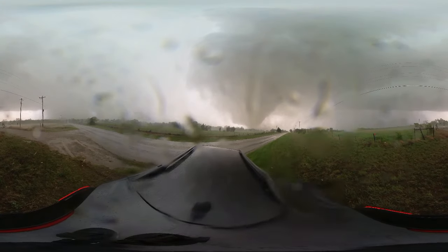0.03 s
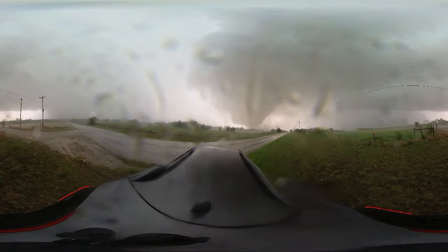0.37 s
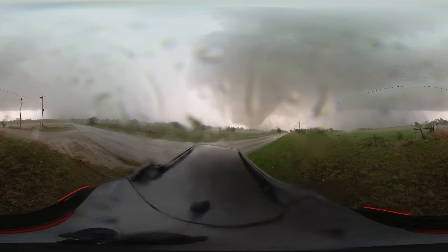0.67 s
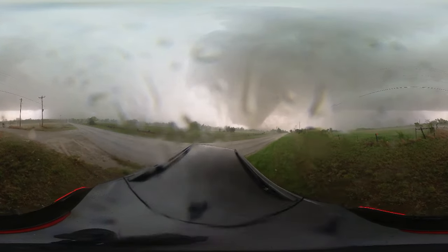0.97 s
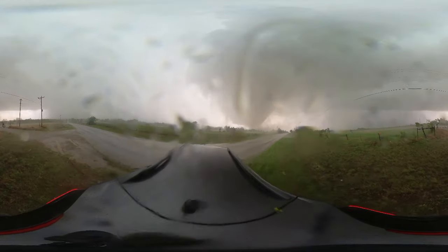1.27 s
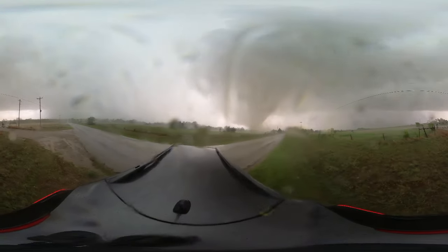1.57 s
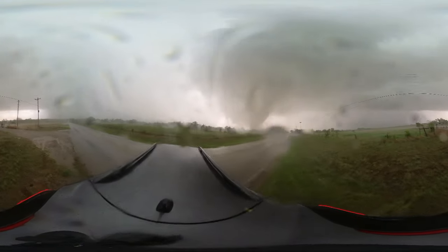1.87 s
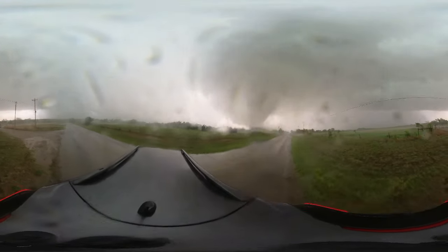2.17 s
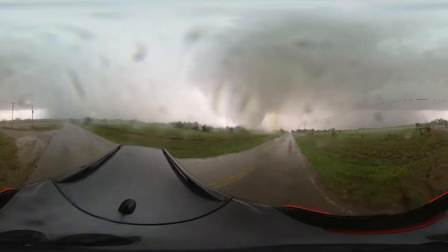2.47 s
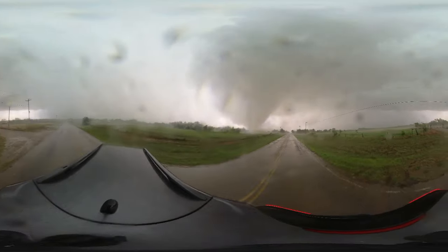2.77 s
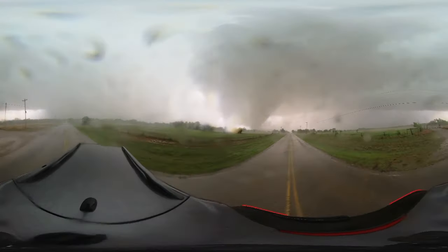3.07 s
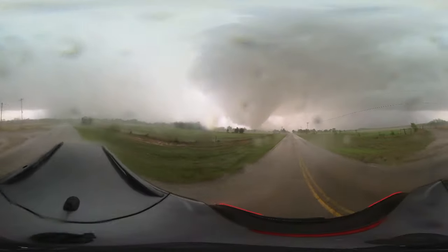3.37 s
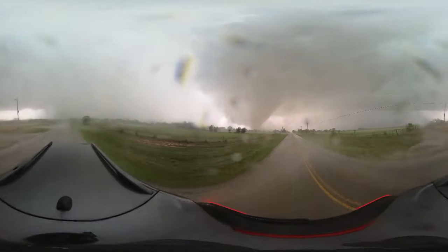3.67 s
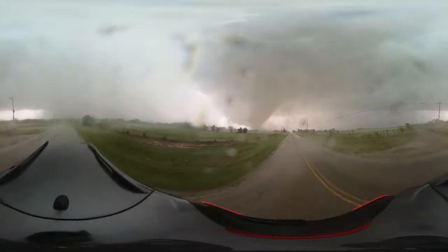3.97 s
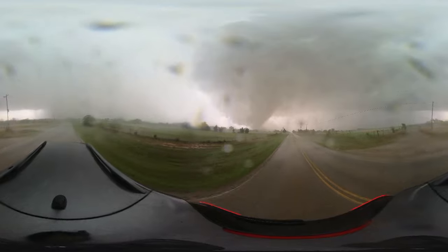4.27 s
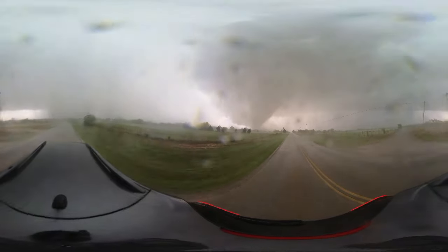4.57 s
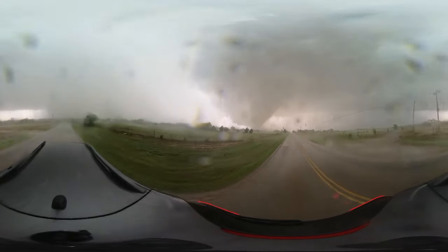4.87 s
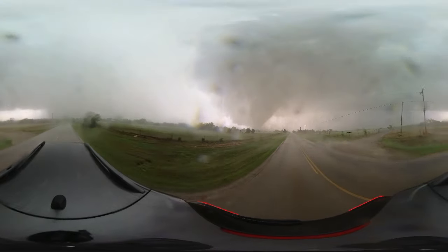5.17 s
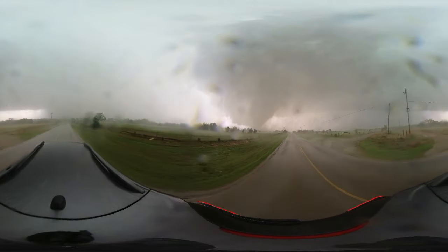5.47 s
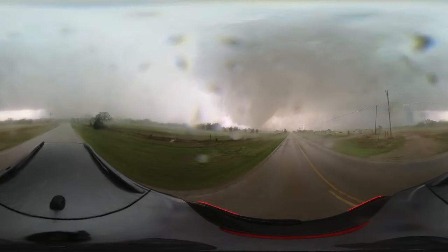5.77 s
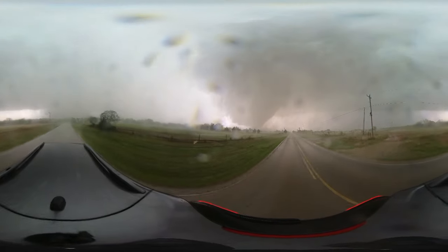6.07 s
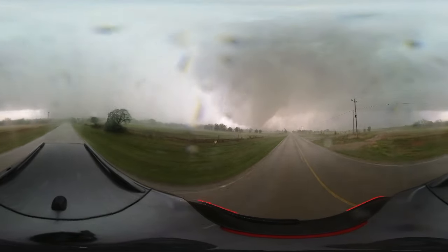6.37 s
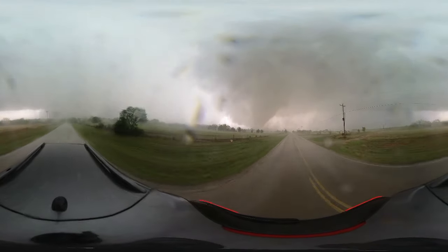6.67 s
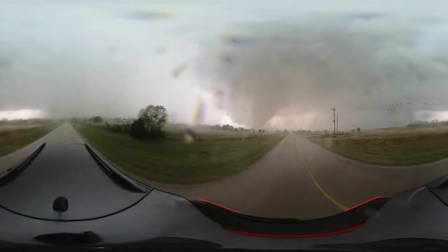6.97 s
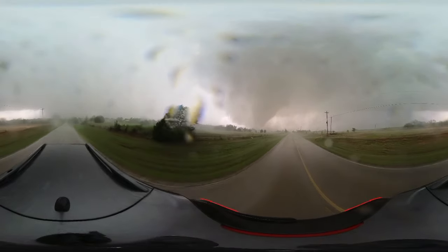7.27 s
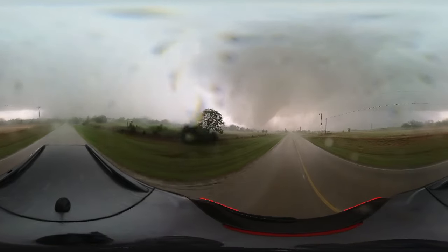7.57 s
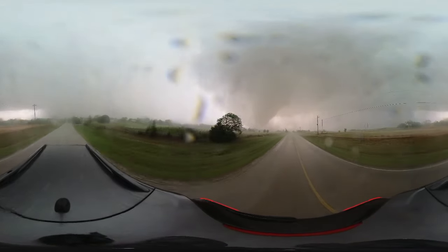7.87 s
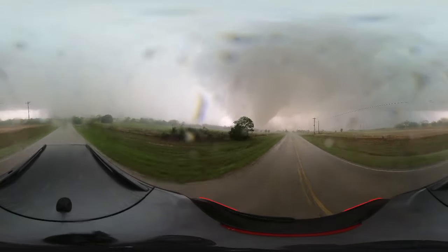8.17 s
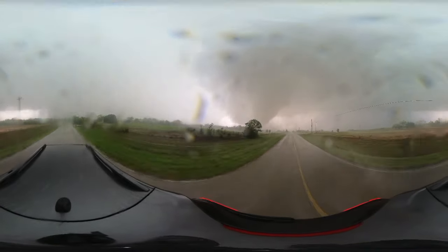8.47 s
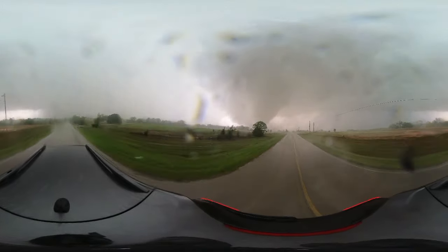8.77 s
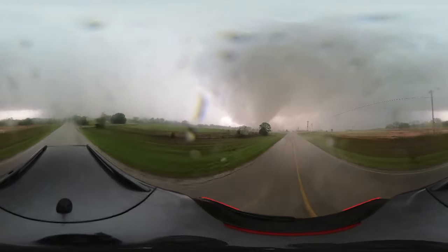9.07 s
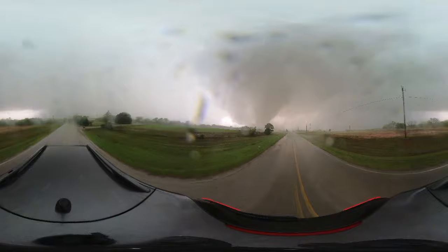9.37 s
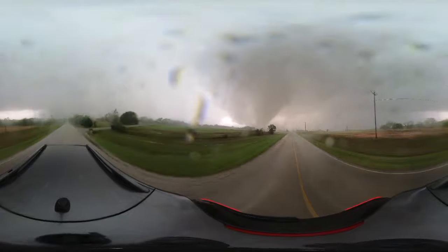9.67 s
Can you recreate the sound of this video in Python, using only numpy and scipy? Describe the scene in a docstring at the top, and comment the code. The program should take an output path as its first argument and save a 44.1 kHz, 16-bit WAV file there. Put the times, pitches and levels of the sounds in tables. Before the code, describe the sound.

Gusty wind buffets a microphone on a moving car, building to a steady low roar with light raindrop ticks and brief wet cracks.

```python
"""Wind buffets a camera microphone on a car roof, first in separate puffs, then as a steady roar,
as the car turns onto a country road and speeds up through a rainstorm. Everything is right at the
microphone: raindrops tick on the housing and dull slaps of wind knock at its port. Near 1.2 s and 7 s
a film of water covers the port, booms, cracks and briefly chokes the roar; the second time air
sputters through it. Mono, with a limiter holding down the peaks."""
import sys
import numpy as np
from scipy import signal
from scipy.fft import rfft, irfft, next_fast_len
from scipy.io import wavfile
from scipy.ndimage import uniform_filter1d, minimum_filter1d, map_coordinates

SR = 44100
rng = np.random.default_rng(int(sys.argv[2]) if len(sys.argv) > 2 else 0)


def int16_out(signal):
    """Quantize to a 16-bit WAV file."""
    q = np.round(np.clip(np.atleast_2d(signal).T, -1, 1) * 32767)
    wavfile.write(sys.argv[1], SR, q.astype(np.int16))


N = 437913
TIME = np.arange(N) / SR

# Airflow over the car roof. Each row: time in seconds, strength in dB against cruising.
AIRFLOW = [(0, -14), (0.2, -12.5), (0.5, -12.5), (1.1, -8.5), (1.4, -9.5), (1.75, -15), (2, -8), (2.4, -7),
           (2.6, -4), (3.6, -0.2), (4.4, 0), (4.85, 1), (5.1, -1.5), (6.4, 0), (6.6, 4.5), (6.78, -2.5),
           (7.5, -3.5), (8.2, 0), (9.93, 1)]
# The wind drops out. Each row: start and end in seconds, depth in dB.
LULLS = [(0.022, 0.062, 4), (0.12, 0.215, 8.5), (0.585, 0.6, 5.5), (1.365, 1.565, 11), (1.565, 1.605, 5.5),
         (1.705, 1.76, 5), (1.885, 1.925, 2.5), (6.9, 6.935, 9), (7.045, 7.1, 13.5), (7.1, 7.185, 7.5),
         (7.151, 7.179, 15)]
# The rain thickens or slackens. Each row: start and end in seconds, dB against the steady drizzle.
SQUALLS = [(0.85, 1.37, 5.5), (1.25, 1.37, 6.5), (2.75, 4.92, 5.5), (2.97, 3.13, 2.5), (3.38, 3.46, 13),
           (3.5, 3.73, 10), (3.585, 3.655, 5), (3.78, 3.88, 14), (3.9, 3.96, 15.5), (3.975, 4.055, 14.5),
           (4.07, 4.15, 7), (4.82, 4.89, 11), (4.95, 5.17, -6), (5.19, 5.27, 11), (5.76, 5.83, 2),
           (6.15, 6.65, 5.5), (7.2, 8.4, -6), (8.62, 9.2, 3), (8.93, 9.03, 1.5), (9.06, 9.1, 5.5),
           (9.65, 9.77, 3)]
# Water covers the port. Each row: start and end in seconds, dB off the wind's rasp, boom level in dB.
FILMS = [(1.066, 1.354, 4.5, -21.5), (6.782, 7.19, 12, -26)]
# Spectrum of pops in the wet port. Each row: frequency in Hz, relative level in dB.
WET_TONE = [(700, -16), (1500, 15.5), (2900, -2.5), (4000, 8), (5100, 1), (6500, 4.5), (7200, -10),
            (8200, -25.5), (12000, -48)]

LULL_EDGE_S, SQUALL_EDGE_S, FILM_EDGE_S = 0.0073, 0.025, 0.023
WET_FROM_S, WET_UNTIL_S = 6.3, 7.3  # the port is soaked


def amp(db):
    """Decibels to gain."""
    return 10 ** (np.asarray(db) / 20)


def unit(x):
    """Scale to rms 1."""
    return x / np.sqrt(np.mean(x ** 2) + 1e-20)


def airflow_db():
    """Strength of the airflow at every sample."""
    return np.interp(TIME, *np.transpose(AIRFLOW))


def gate(start, end, edge_s):
    """Rises to 1 at the start, holds, and falls at the end."""
    return np.clip(np.minimum(TIME - start, end - TIME) / edge_s + .5, 0, 1)


def held(rows, edge_s):
    """Sum of (start, end, value) events, each held for its length."""
    return sum(value * gate(start, end, edge_s) for start, end, value in rows)


def bursts(rows, edge_s):
    """Gain of (start, end, dB) events, silent between them."""
    return held([(start, end, amp(db)) for start, end, db in rows], edge_s)


def wobble(rate):
    """A smooth random curve, rate knots a second."""
    knots = rng.standard_normal(N // 8)
    return map_coordinates(knots, [TIME * rate], mode="wrap")


def gains(tone, hz):
    """Gain of a (Hz, dB) spectrum, read on a log axis."""
    tone_hz, db = np.transpose(tone)
    return amp(np.interp(np.log(hz + 1), np.log(tone_hz + 1), db))


def filtered(x, response):
    """Filter x by a gain that is a function of frequency."""
    size = next_fast_len(N + SR // 2)
    return irfft(rfft(x, size) * response(np.fft.rfftfreq(size, 1 / SR)), size)[:N]


def coloured(x, tone):
    """x given a spectrum, at rms 1."""
    return unit(filtered(x, lambda hz: gains(tone, hz)))


def impulse(tone, size=1024):
    """The causal click that has this spectrum, at peak 1."""
    cepstrum = irfft(np.log(gains(tone, np.fft.rfftfreq(size, 1 / SR))))
    cepstrum[1:size // 2] *= 2
    cepstrum[size // 2 + 1:] = 0
    click = irfft(np.exp(rfft(cepstrum)))
    return click / np.abs(click).max()


def turbulence(tone, swirl_db):
    """Noise that comes in quick lumps as eddies pass, but holds its strength over a tenth of a second."""
    noise = coloured(rng.standard_normal(N) * amp(swirl_db), tone)
    power = uniform_filter1d(uniform_filter1d(noise ** 2, size=SR // 10), size=SR // 20)
    return noise / np.sqrt(np.abs(power) + 1e-9)


def splashed(hits, tone, splash_s=0.0071, splash_share=0.74):
    """Each impact trails its own brief splash, so that no two have quite the same colour."""
    fade = amp(-60 * TIME[:SR // 20] / splash_s) ** 2
    power = np.abs(signal.fftconvolve(hits ** 2, fade / fade.sum())[:N])
    splash = splash_share * np.sqrt(power) * rng.standard_normal(N)
    return signal.fftconvolve(hits + splash, impulse(tone))[:N]


def crackle(tone, per_second, spread_db):
    """Tiny wet impacts at random moments and of very uneven size, at rms 1."""
    hits = rng.random(N) < per_second / SR
    sizes = amp(spread_db * np.clip(rng.standard_normal(N), -2, 1.5))
    signs = rng.choice([-1, 1], N)
    return unit(splashed(hits * sizes * signs, tone))


def drizzle():
    """Small drops patter on the housing in flurries, louder with the airflow and in squalls."""
    # Spectrum of the patter. Each row: frequency in Hz, relative level in dB.
    patter_tone = [(500, -9), (1000, 7.5), (1500, 9.5), (2500, 0), (4000, 5.5), (6200, -1), (7500, -13),
                   (10000, -34), (15500, -60.5)]
    level_db = -77.5 + 0.26 * airflow_db() + np.minimum(held(SQUALLS, SQUALL_EDGE_S), 5)
    flurries = amp(8 * np.clip(wobble(16), -2, 1.5))
    return amp(level_db) * crackle(patter_tone, per_second=26 * flurries, spread_db=5.5)


def spatter():
    """Squalls throw bright clumps of droplets: more and harder in heavier rain, with a hiss of mist."""
    # Spectrum of droplets and mist. Each row: frequency in Hz, relative level in dB.
    spray_tone = [(600, -7), (1200, 9), (2000, 7), (3900, 10.5), (5300, 4), (7000, 3), (8500, -1.5),
                  (10500, -6), (13000, -13.5), (15500, -21.5)]
    extra_rain = np.maximum(amp(held(SQUALLS, SQUALL_EDGE_S)) - 1, 0)  # in multiples of the drizzle
    droplets = np.sqrt(extra_rain) * crackle(spray_tone, per_second=80 * extra_rain, spread_db=4.2)
    mist_gain = amp(-9.5) * extra_rain * np.minimum(extra_rain / 6, 1)
    mist = mist_gain * turbulence(spray_tone, 4 * wobble(200))
    clumps = unit(amp(4 * np.clip(wobble(60), -2, 1.2)))
    return amp(-75.5) * clumps * (droplets + mist)


def pips(per_second, hz, scatter, cycles, spread_db):
    """Small drops carried by the flow ring the port, each at its own pitch and size; rms 1."""
    starts = np.flatnonzero(rng.random(N) < per_second / SR)
    pitch, size = rng.standard_normal((2, N))[:, starts]
    ring_hz = np.minimum(hz * np.exp(scatter * pitch), SR / 3)
    offsets = np.arange(SR // 100)
    turns = ring_hz[:, None] * offsets / SR
    shape = turns * np.exp(-np.log(1000) * turns / cycles) * np.sin(2 * np.pi * turns)
    rings = amp(spread_db * np.clip(size, -2, 1.5))[:, None] * shape
    samples = starts[:, None] + offsets
    return unit(np.bincount(samples.ravel(), rings.ravel(), N)[:N])


def port_knocks(ring_s=0.007, push_s=0.0022):
    """Sharp raindrop ticks and dull slaps of wind push on the diaphragm and briefly ring the port."""
    # Knocks at the port. Each row: time in seconds, relative ring dB, pitch in Hz, relative snap dB.
    strikes = [(0.309, -21, 1250, -49), (0.388, -21, 710, -53), (0.78, -16.5, 600, -47.5),
               (0.956, -17, 900, -52), (1.269, -8.5, 1100, -36.5), (1.307, -9, 1200, -33),
               (1.321, -15, 820, -41.5), (1.34, -8.5, 1160, -27.5), (1.346, -15.5, 1180, -40),
               (1.361, -23, 1150, -44.5), (1.468, -23, 900, -53), (2.567, -10.5, 866, -47.5),
               (2.67, -17, 1010, -47.5), (2.822, -16.5, 1000, -49), (2.999, -13, 700, -41),
               (3.025, -10, 610, -39), (3.162, -14, 790, -40.5), (3.243, -3, 1250, -28),
               (3.365, -10, 1170, -41), (3.408, -6, 1060, -36.5), (3.512, -22, 1000, -45.5),
               (3.575, -10, 1240, -38.5), (3.592, -20, 1100, -40.5), (3.702, -18, 1000, -45.5),
               (3.746, -5.5, 980, -35.5), (3.793, -21, 1000, -44.5), (3.805, -10.5, 970, -39),
               (3.812, -16, 970, -33.5), (3.837, -14, 1000, -40), (3.906, -26, 1000, -41.5),
               (3.995, -17, 1000, -46), (4.044, -7, 1000, -33.5), (4.304, -25, 900, -50),
               (4.444, -14.5, 1000, -47.5), (4.578, -27, 990, -45), (4.607, -20, 1000, -47.5),
               (4.627, -11, 990, -45.5), (4.844, -6, 1170, -39), (4.863, -11, 620, -39),
               (4.893, -7.5, 1170, -42), (4.955, -15, 1000, -57.5), (5.204, -11.5, 587, -52),
               (5.258, -12.5, 1000, -49), (5.368, -23, 1000, -50), (5.577, -5, 1190, -53),
               (5.787, -15, 840, -48), (5.834, -8, 980, -56), (5.856, -10, 670, -60), (6.579, 0, 597, -54),
               (6.742, -14, 800, -54), (6.785, -10, 577, -60), (6.8, -13.5, 930, -60),
               (7.227, -14.5, 600, -50), (7.445, -12.5, 650, -70), (7.521, -12, 800, -55),
               (7.598, -11.5, 850, -44), (7.874, -4.5, 980, -45), (7.914, -12.5, 890, -59),
               (8.654, -15, 1000, -50), (8.786, -12, 753, -62), (9.07, -16.5, 1000, -46),
               (9.079, -13, 1120, -43), (9.087, -20, 900, -52), (9.123, -12.5, 1000, -54.5),
               (9.139, -23, 1000, -52), (9.288, -14.5, 900, -58.5), (9.655, -16.5, 1000, -51),
               (9.708, -9.5, 680, -48.5), (9.758, -21, 1000, -57)]
    # Spectrum of a snap on the housing. Each row: frequency in Hz, relative level in dB.
    snap_tone = [(800, -20), (1900, 6), (2500, -8.5), (3100, 2), (3700, 8.5), (4300, 5.5), (5300, -5.5),
                 (6900, -5.5), (9500, -14.5), (12000, -23), (15500, -29.5)]
    t = TIME[:SR // 40]
    decay = amp(-60 * t / ring_s)
    push_age = t / push_s
    push = amp(-5) * push_age * (2 - push_age) * np.exp(-push_age)
    rings, snaps = np.zeros(N + SR), np.zeros(N)
    for start, ring_db, hz, snap_db in strikes:
        at = round(start * SR)
        ring = decay * np.sin(2 * np.pi * hz * t + np.pi / 8)  # the abrupt start gives a hard edge
        rings[at:at + len(t)] += amp(ring_db + 2) * (ring - push)
        snaps[at] = amp(snap_db + 4.5)
    knocks = signal.sosfilt(signal.butter(7, 2900, fs=SR, output="sos"), rings[:N])
    wet = (TIME > WET_FROM_S) & (TIME < WET_UNTIL_S)  # the soaked port dulls the snaps
    return knocks + splashed(snaps * ~wet, snap_tone) + splashed(snaps * wet, WET_TONE)


def sputter(edge_s=0.012):
    """Air fizzes in spurts through a film of water in the port, whose cavity rings faintly."""
    # Spurts of air. Each row: start and end in seconds, level in dB.
    spurts = [(6.772, 6.895, -53), (6.89, 7.03, -59.5), (6.935, 6.995, -55), (7.105, 7.13, -64)]
    # Resonance of the soaked port. Each row: frequency in Hz, relative level in dB.
    cavity_tone = [(1200, -61.5), (1440, -7.5), (1475, 3), (1510, -14), (1700, -62.5)]
    pops = crackle(WET_TONE, per_second=200, spread_db=7.5)
    fizz = amp(-5.5) * turbulence(WET_TONE, 4 * wobble(150))
    wet = gate(WET_FROM_S, WET_UNTIL_S, edge_s)
    ring = amp(-61.5) * wet * coloured(rng.standard_normal(N), cavity_tone)
    return bursts(spurts, edge_s) * (pops + fizz) + ring


def film_flapping():
    """A film of water over the port flaps in the wind: it booms, and the air behind it rings hollowly."""
    # Spectrum of the covered port. Each row: frequency in Hz, relative level in dB.
    film_tone = [(30, -25), (55, 4.5), (100, 6), (150, -9), (300, -32.5), (800, -45), (1050, -19.5),
                 (1250, -26), (1500, -39), (2500, -78)]
    cover = bursts([(start, end, db) for start, end, _, db in FILMS], FILM_EDGE_S)
    return cover * amp(-held(LULLS, LULL_EDGE_S)) * turbulence(film_tone, 3.3 * wobble(88))


def film_cracks(boom_hz=145, boom_s=0.033):
    """The water film snaps with a spike of pressure, and the air in the port swings low and briefly."""
    # Snaps of the film. Each row: time in seconds, then relative dB of crack, boom and wet snap.
    ruptures = [(1.341, -26, -15, -60), (6.786, -17, -14, -37), (6.8, -15, -26, -48),
                (6.831, -11, -29, -30.5), (6.835, -14, -20, -31.5), (6.866, -15, -24, -37),
                (6.873, -16, -7, -42), (6.884, -12.5, -5, -34), (6.89, -19, -17, -49),
                (6.944, -28, -16, -44), (6.965, -27, -10, -45), (6.984, -19.5, -8, -42),
                (7.032, -8.5, -19, -46), (7.037, -15, -5, -50), (7.05, -15, -13, -42),
                (7.069, -41, -40, -64), (7.09, -8, -3, -54.5), (7.099, -23, -34, -58),
                (7.101, -11, -16, -53), (7.113, -30.5, -32, -59), (7.126, -22, -28, -55),
                (7.135, -11.5, -26, -53), (7.137, -17.5, -28, -52), (7.14, -8, -21, -50),
                (7.144, -26.5, -34, -60), (7.148, -20, -36, -52)]
    # Spectrum of the pressure spike. Each row: frequency in Hz, relative level in dB.
    spike_tone = [(100, -2), (500, 3.5), (1200, -1.5), (1800, -11), (3000, -24), (4000, -28.5), (5300, -37),
                  (6200, -62), (12000, -85.5)]
    t = TIME[:SR // 10]
    boom = np.cos(2 * np.pi * boom_hz * t) * amp(-60 * t / boom_s)
    boom = signal.sosfilt(signal.butter(3, 700, fs=SR, output="sos"), boom)
    spike = impulse(spike_tone)
    blows, snaps = np.zeros(N), np.zeros(N)
    for start, crack_db, boom_db, snap_db in ruptures:
        at = round(start * SR)
        blows[at:at + len(spike)] += amp(crack_db) * spike
        blows[at:at + len(boom)] += amp(boom_db) * boom
        snaps[at] = amp(snap_db + 5)
    return blows + splashed(snaps, WET_TONE)


def puffs(attack_s=0.002, release_s=0.024, sag_db_per_s=44.5):
    """The flow catches the port's edge, sags and dies away; the stronger the puff, the brighter it tears."""
    # Puffs that hit the port head-on. Each row: start and end in seconds, relative level in dB.
    head_on = [(0.004, 0.008, -28.5), (0.076, 0.084, -36), (0.1, 0.099, -35), (0.237, 0.252, -39),
               (0.273, 0.3, -46), (0.399, 0.405, -27.5), (0.486, 0.547, -23.5), (0.564, 0.582, -33),
               (0.603, 0.641, -24), (0.664, 0.679, -23.5), (0.687, 0.7, -23.5), (0.722, 0.726, -26.5),
               (0.745, 0.762, -24), (0.782, 0.797, -33), (0.805, 0.814, -19.5), (0.827, 0.874, -25.5),
               (0.901, 0.939, -24), (0.944, 0.997, -22), (1.002, 1.031, -25), (1.045, 1.067, -27),
               (1.249, 1.266, -32), (1.398, 1.406, -30.5), (1.416, 1.433, -33), (1.441, 1.455, -32.5),
               (1.458, 1.475, -35), (1.48, 1.501, -32), (1.506, 1.507, -35), (1.561, 1.56, -40),
               (1.612, 1.624, -26.5), (1.638, 1.669, -27.5), (1.672, 1.685, -35.5), (1.84, 1.854, -33),
               (1.93, 1.936, -33), (2.016, 2.038, -33), (5.578, 5.576, -32), (7.287, 7.298, -22.5),
               (7.917, 7.92, -22)]
    # Spectra of a puff's body and bright edge. Each row: frequency in Hz, relative level in dB.
    body_tone = [(120, -4.5), (300, 8.5), (580, 8.5), (950, -7), (1400, 0), (1560, -13.5), (2100, -18.5),
                 (3100, -30), (4000, -46), (6000, -84.5), (15000, -110)]
    edge_tone = [(1000, -30.5), (1600, 5), (2200, -1), (3050, -4), (3600, -19), (4300, -34), (6000, -76)]
    strength = np.zeros(N + SR)
    t = TIME[:SR // 4]
    attack = np.minimum(t / attack_s, 1)
    for start, end, db in head_on:
        fall_db = sag_db_per_s * t + 60 * np.maximum(t - (end - start), 0) / release_s
        at = round(start * SR)
        strength[at:at + len(t)] += attack * amp(db - fall_db)
    strength = strength[:N]
    swirl_db = 3.5 * wobble(300) + 1.5 * wobble(70)
    tear = amp(-1.5) * strength * turbulence(edge_tone, swirl_db)
    return amp(4.5) * strength * (turbulence(body_tone, swirl_db) + tear)


def wind_levels():
    """Buffet, roar and rasp in dB: all sink in lulls; roar and rasp grow with flow and choke under water."""
    # Big eddies. Each row: start and end in seconds, dB added to the buffet, dB added to the roar.
    gusts = [(0.286, 0.43, 4, 1.5), (0.94, 1.0, -2, 1.5), (1.056, 1.107, 3.5, 3.5), (1.245, 1.272, 3, 12),
             (1.634, 1.684, 7, 6.5), (2.226, 2.308, 2.5, 2), (4.81, 5.15, 2, -1), (6.023, 6.09, 1.5, 3.5),
             (6.86, 6.902, 0.5, 5), (6.99, 7.022, 5.5, 5), (9.02, 9.097, 3, 2), (9.3, 9.37, -1, 1),
             (9.662, 9.737, 0, 3.5)]
    gust_edge_s = 0.021
    flow_db = airflow_db()
    lull_db = held(LULLS, LULL_EDGE_S)
    film_db = held([(start, end, db) for start, end, db, _ in FILMS], FILM_EDGE_S)
    thump_db = held([(start, end, db) for start, end, db, _ in gusts], gust_edge_s)
    surge_db = held([(start, end, db) for start, end, _, db in gusts], gust_edge_s)
    swell_db = 0.9 * wobble(6)
    buffet_db = -21 - 0.028 * flow_db - lull_db + thump_db
    roar_db = -23 + 0.22 * flow_db - lull_db + surge_db + swell_db - 0.62 * film_db
    rasp_db = -28.5 + 1.11 * flow_db - lull_db + swell_db - film_db
    return buffet_db, roar_db, rasp_db


def wind():
    """Large eddies thump the microphone; smaller ones roar and rasp, and the flow carries small drops."""
    # Spectra of the wind as heard through the camera. Each row: frequency in Hz, relative level in dB.
    buffet_tone = [(15, -63), (28, -26), (40, -13.5), (52, -8.5), (78, -10), (105, -5.5), (145, 0.5),
                   (172, -2), (200, -11), (260, -25), (500, -96)]
    roar_tone = [(130, -46), (205, -0.5), (245, 1.5), (330, -2), (470, -3), (620, -8), (790, -27.5),
                 (1000, -42), (1500, -58), (3000, -100)]
    rasp_tone = [(380, -29.5), (620, 6.5), (780, 5.5), (1000, -1), (1470, -5), (1520, -23.5), (2000, -21),
                 (2500, -33), (2900, -37), (3500, -51), (4100, -53), (5200, -66), (9000, -90.5),
                 (15000, -115)]  # the camera's processing drops it sharply above 1.5 kHz
    tear_tone = [(1000, -27), (1550, 9), (2050, 4), (2500, -3.5), (2950, -3), (3450, -19), (4100, -24.5),
                 (4900, -45.5), (9000, -65)]
    buffet_db, roar_db, rasp_db = wind_levels()
    eddies, flutter = wobble(55), wobble(330)
    buffet = turbulence(buffet_tone, 2.6 * eddies)
    roar = turbulence(roar_tone, 1.7 * eddies + 2.7 * flutter)
    # weak flow comes in fits, strong flow evenly; the rasp flares on the crests of the pressure waves
    weak_to_strong_db = [-44, -31]
    fitful_db = np.interp(rasp_db, weak_to_strong_db, [3.8, 1.7])
    swirl_db = fitful_db * eddies + 4 * flutter + 0.73 * np.abs(buffet)
    rasp = turbulence(rasp_tone, swirl_db)
    # the finest eddies grow faster than the rest, so strong flow is brighter
    tear_db = np.interp(rasp_db, weak_to_strong_db, [-28, -17])
    tear = amp(tear_db) * turbulence(tear_tone, 1.13 * swirl_db)
    pip_db = -16.5 + 0.45 * held(SQUALLS, SQUALL_EDGE_S)  # against the rasp, harder in a squall
    droplets = amp(pip_db) * pips(per_second=55, hz=1070, scatter=0.11, cycles=2.3, spread_db=4.5)
    return amp(buffet_db) * buffet + amp(roar_db) * roar + amp(rasp_db) * (rasp + tear + droplets)


def scene():
    """Wind and water, all right at the one microphone on the roof."""
    air = wind() + puffs()
    water_film = film_flapping() + film_cracks()
    return (air + water_film + port_knocks() + drizzle() + spatter() + sputter())[None]


def record(dry, fade_s=0.012, ceiling_db=-4.5, top_hz=15700):
    """The sound fades in, a look-ahead limiter ducks the strongest blows, and the top treble is cut."""
    sound = dry[0] * np.minimum(1, TIME / fade_s)
    needed_gain = np.minimum(1, amp(ceiling_db) / (np.abs(sound) + 1e-9))
    lowest_gain = minimum_filter1d(needed_gain, size=200)
    gain = uniform_filter1d(uniform_filter1d(lowest_gain, size=100), size=100)
    return filtered(sound * gain, lambda hz: hz < top_hz)[None]


dry = scene()
out = record(dry)
int16_out(out)
```